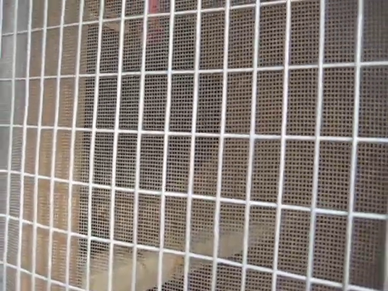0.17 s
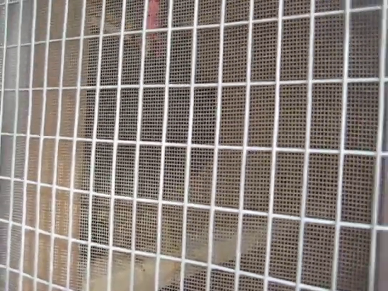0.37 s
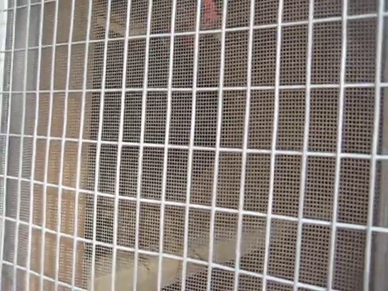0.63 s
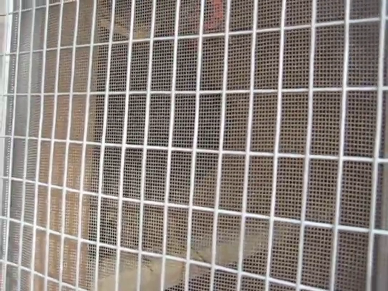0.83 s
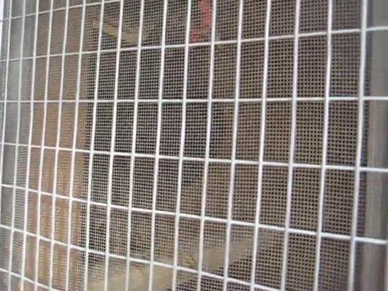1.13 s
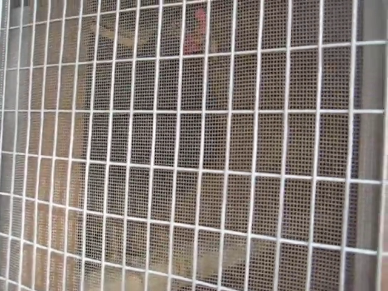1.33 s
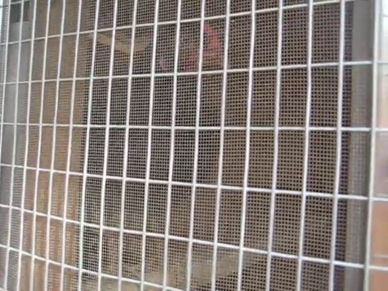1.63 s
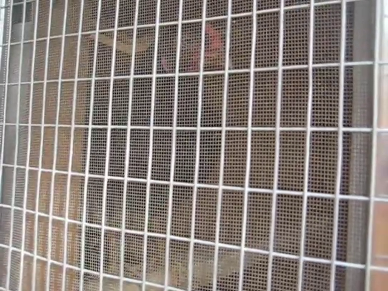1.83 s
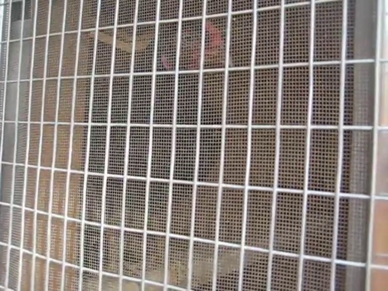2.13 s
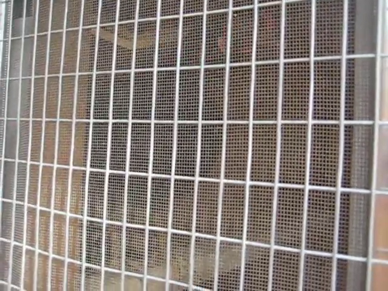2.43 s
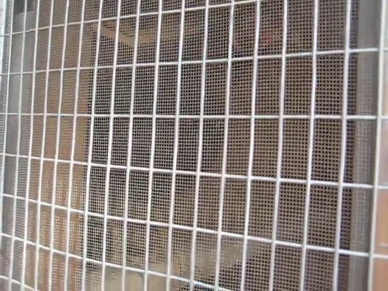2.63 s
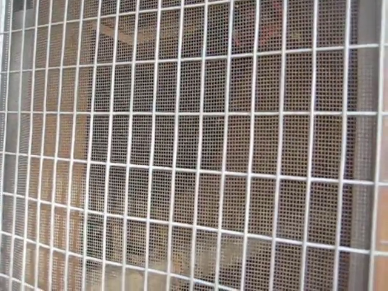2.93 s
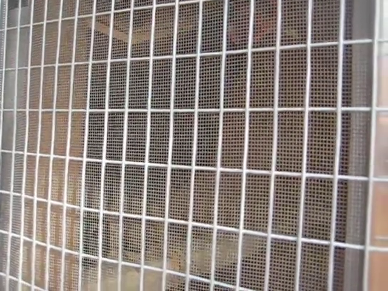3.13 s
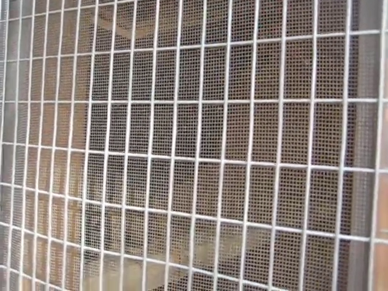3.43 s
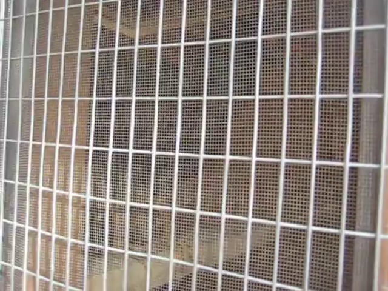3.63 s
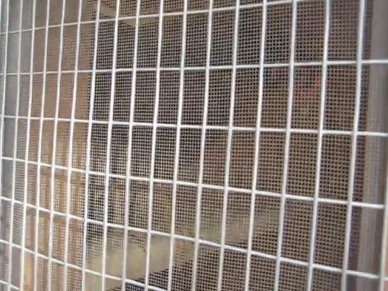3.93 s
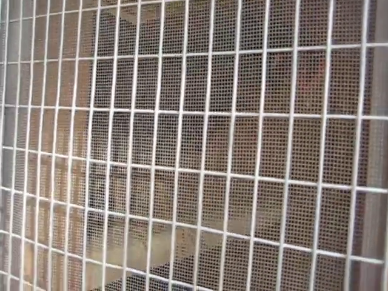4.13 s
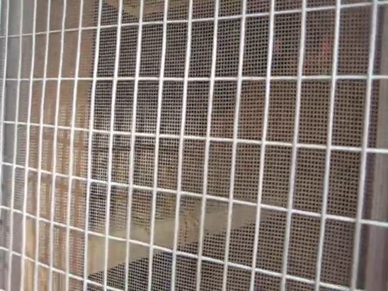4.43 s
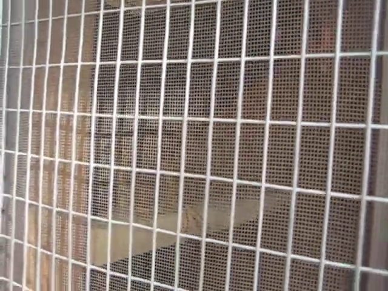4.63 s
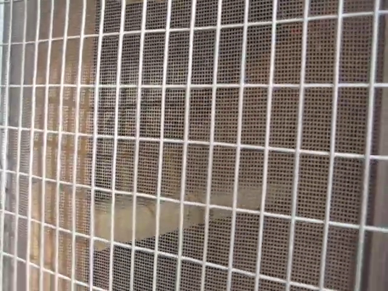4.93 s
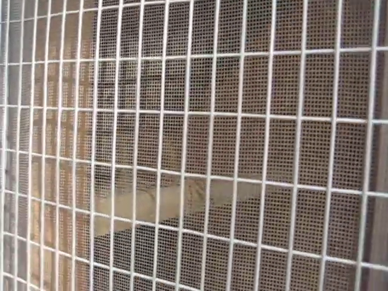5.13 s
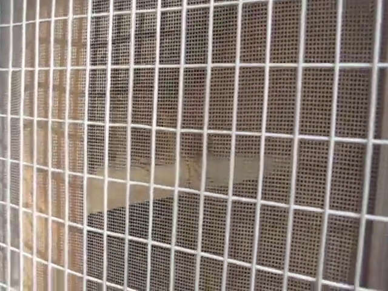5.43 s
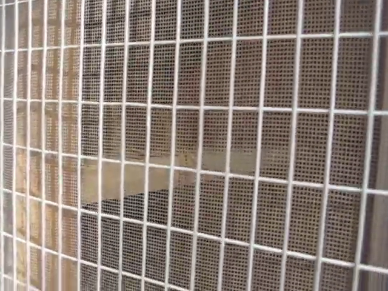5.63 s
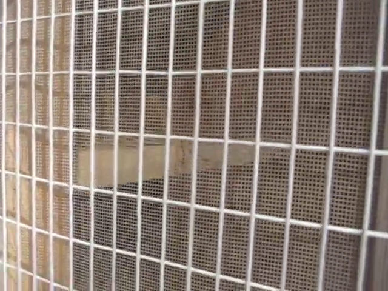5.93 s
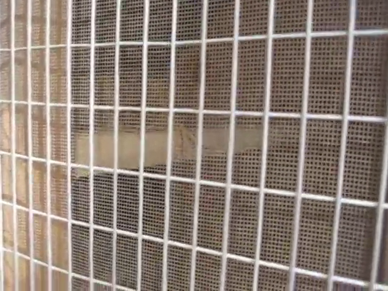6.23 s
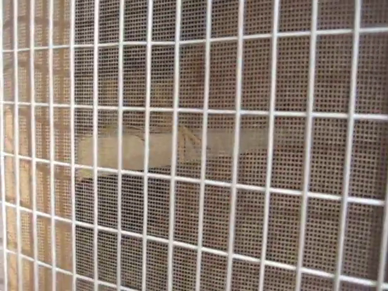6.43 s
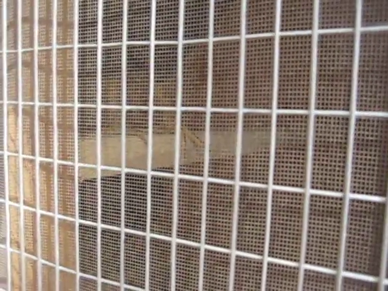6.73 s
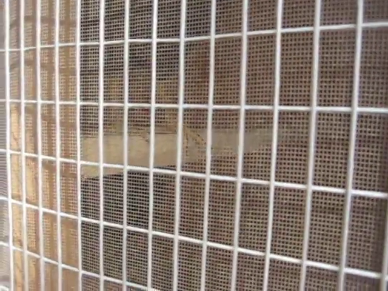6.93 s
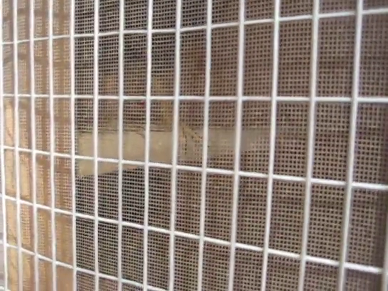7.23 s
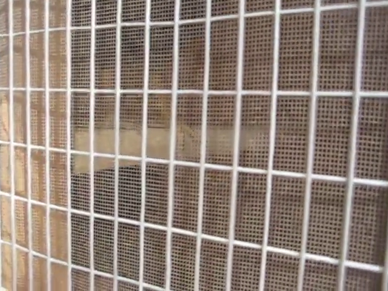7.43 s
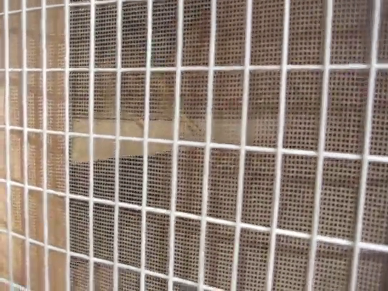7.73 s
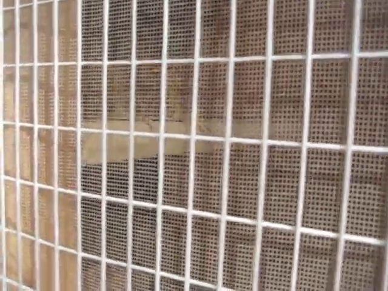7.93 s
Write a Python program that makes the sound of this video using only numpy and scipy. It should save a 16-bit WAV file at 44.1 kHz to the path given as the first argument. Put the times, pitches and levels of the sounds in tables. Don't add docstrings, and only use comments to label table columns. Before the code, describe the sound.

A hen in a wire-fronted wooden coop cackles in rapid hoarse bursts, pauses, then pipes, clucks and squawks roughly over a humming, insect-filled yard.

```python
import sys
import numpy as np
from scipy import signal
from scipy.fft import rfft, irfft, next_fast_len
from scipy.io import wavfile
from scipy.ndimage import uniform_filter1d, map_coordinates

SR = 44100
rng = np.random.default_rng(int(sys.argv[2]) if len(sys.argv) > 2 else 0)


def wrap_up_sound(samples):
    columns = np.atleast_2d(samples).T
    tamed = np.clip(columns, -1, 1)
    steps = np.round(tamed * 32767).astype(np.int16)
    wavfile.write(sys.argv[1], SR, steps)


def voltage_ratio(decibels):
    exponent = np.asarray(decibels, float) / 20
    return 10 ** exponent


N = 355887
T = np.arange(N) / SR


def unit(x):
    return x / np.sqrt(np.mean(np.abs(x) ** 2) + 1e-20)


def ramp(t, length):
    return np.clip(t / length, 0, 1)


def along(points, hz):
    f, v = np.transpose(points)
    return np.interp(np.log(hz + 1), np.log(f + 1), v)


def wobble(rate):
    knots = rng.standard_normal(int(N * rate / SR) + 4)
    return unit(map_coordinates(knots, [T * rate]))


def filtered(x, response):
    m = next_fast_len(N + 8192)
    return irfft(rfft(x, m) * response(np.fft.rfftfreq(m, 1 / SR)), m)[:N]


def resonances(modes):
    def response(f):
        total = 0
        for k, (hz, width, db) in enumerate(modes):
            mode = 1j * f * width / (hz * hz - f * f + 1j * f * width)
            total = total + (-1) ** k * voltage_ratio(db) * mode
        return total
    return response


def latest(rows):
    which = np.clip(np.searchsorted([r[0] for r in rows], T) - 1, 0, None)
    s, *cols = np.array(rows)[which].T
    return T - s, cols


def calls(tables, edge):
    s, *cols = np.transpose(np.concatenate(tables))
    inside = sum((T >= c[0][0] + edge / 2) & (T < c[-1][0] + edge) for c in tables) > 0
    gate = uniform_filter1d(1. * inside, size=int(edge * SR))
    return [np.interp(T, s, c) for c in cols], gate


def steady(slaps):
    return np.tile(slaps, (N, 1))


def turning(x):
    hz, _, z = signal.stft(x, SR, nperseg=512)
    field = uniform_filter1d(rng.standard_normal(z.shape), size=4, axis=0)
    field = uniform_filter1d(field, size=9, axis=1)
    depth_db = 2.6 + 3.5 * ramp(hz - 4000, 4000)[:, None]
    return signal.istft(z * voltage_ratio(depth_db * unit(field)), nperseg=512)[1][:N]


def rasp(gate, slaps, throat_db, beak_db, throat, beak, breath, top_hz=7000):
    rate, uneven = slaps.T
    jitter = 1 + uneven * np.clip(wobble(300), -1.8, 1.8) / 2
    drift = 1 + .07 * uneven * wobble(15)
    cycles = np.cumsum(rate * jitter * drift) / SR
    slap_size = voltage_ratio(8 * uneven * np.clip(wobble(400), -2, 1.5))
    slap = np.diff(np.floor(cycles), prepend=0) * slap_size
    air = rng.standard_normal(N) * np.exp(-3 * (cycles % 1))
    source = unit(slap - slap.mean()) + breath * uneven * unit(air)
    out = 0
    for modes, db in ((throat, throat_db), (beak, beak_db)):
        def tract(f):
            slopes = (1j * f / (380 + 1j * f)) ** 3 / (1 + 1j * f / top_hz) ** 2
            return resonances(modes)(f) * slopes
        out = out + filtered(source * gate * voltage_ratio(db), tract) / np.std(filtered(source, tract))
    return turning(out)


def bursts(t, throat_db, beak_db, rise, hold, t60, slaps, throat, beak, breath, top_hz):
    swell = ramp(t, rise) ** 2
    crack = np.clip(0.0041 / rise, 0, .6)
    push = (t > 0) * (crack + (1 - crack) * swell)
    fade_db = -60 * np.clip(t - rise - hold, 0, None) / t60 - 40 * np.clip(t - rise, 0, hold)
    bright_db = beak_db + 1.2 * fade_db - 150 * rise * (1 - swell)
    return rasp(push, slaps, throat_db + fade_db, bright_db, throat, beak, breath, top_hz)


def partial(hz, db, flutter, rough):
    rough = np.clip(rough, 0, 1)
    keep = np.exp(-np.pi * flutter / SR)
    complex_noise = [1, 1j] @ rng.standard_normal((2, N))
    chaos = unit(signal.lfilter([1], [1, -2 * keep, keep ** 2], complex_noise))
    swing = np.sqrt(1 - rough ** 2) + rough * chaos
    return np.sqrt(2) * voltage_ratio(db) * np.imag(swing * np.exp(2j * np.pi * np.cumsum(hz) / SR))


def syrinx(pitch_hz, partials_db, gate, flutter, rough):
    pitch_hz = pitch_hz * (1 + 0.005075 * wobble(45))
    tone = 0
    for k, db in enumerate(partials_db):
        tone = tone + partial((k + 1) * pitch_hz, db, flutter * (k + 1), rough + 0.2 * k)
    return gate * tone


def notes(tables, rough, third_db, gain_db=0):
    (pitch_hz, db, octave_db), gate = calls(tables, edge=0.0067)
    partials_db = [db, octave_db, octave_db + third_db]
    return voltage_ratio(gain_db) * syrinx(pitch_hz, partials_db, gate, flutter=72, rough=rough)


# start_s, throat_db, beak_db, rise_s, slaps_per_s
CACKLES = [(-.02, -17, -23.5, 0.0092, 343), (.145, -16.5, -20.5, 0.0044, 346),
           (.3135, -17, -19, 0.0034, 285), (.484, -17, -19.5, 0.01, 302), (.662, -17, -23, 0.016, 354),
           (.857, -18, -22, 0.02, 338), (1.1, -16.5, -21.5, 0.025, 303), (1.229, -16, -25.5, 0.013, 275),
           (1.423, -18, -25, 0.027, 386), (1.658, -19.5, -25, 0.026, 420),
           (1.785, -16.5, -26.5, 0.023, 351)]
CACKLE_UNEVEN = [.36, .36, .38, .36, .26, .3, .32, .27, .22, .22, .06]
CACKLE_FADES = [0.23, 0.23, 0.18, 0.18, 0.2, 0.15, 0.11, 0.12, 0.11, 0.085, 0.07]
# centre_hz, width_hz, level_db
CACKLE_THROAT = [(299, 88, -9.5), (538, 98, -4), (783, 115, 0.5), (1150, 245, 6.5), (1368, 377, 2.5),
                 (2070, 194, -5.5)]
CACKLE_BEAK = [(2840, 320, 6), (3460, 360, 8), (4100, 420, 1.5), (5350, 410, -6.5), (6520, 490, -12.5),
               (8060, 570, -15.5), (9750, 1400, -25), (13400, 1200, -28)]


def cackles():
    rows = np.column_stack([CACKLES, CACKLE_UNEVEN, CACKLE_FADES])
    t, (throat_db, beak_db, rise, rate, uneven, t60) = latest(rows)
    rate = rate * (1 - .1 * (1 - ramp(t, .045)))
    slaps = np.transpose([rate, uneven])
    return bursts(t, throat_db, beak_db, rise, 0.032, t60, slaps, CACKLE_THROAT, CACKLE_BEAK,
                  breath=.35, top_hz=14000)


# frequency_hz, density_db per Hz
YARD = [(15, -40.5), (25, -2.5), (60, 8.5), (250, 8), (850, 4.5), (1800, -1), (3300, -7), (5000, -9),
        (6200, -9.5), (9000, -12), (11300, -9.5), (12600, -23.5), (15700, -18.5)]
# time_s, level_db
CRICKETS = [
    (0, -46.5),
    (1.8, -44),
    (2.2, -47.5),
    (8.07, -47),
]
# frequency_hz, level_db
WHINES = [(7558, -59), (7590, -63), (7881, -68), (11488, -69), (15122, -75), (15149, -72)]


def yard():
    def noise(response):
        return unit(filtered(rng.standard_normal(N), response))

    def band(hz, width_hz):
        return noise(lambda f: resonances([(hz, width_hz, 0)])(f) ** 2)

    air = voltage_ratio(-43.0 + 0.045 * wobble(2.2)) * noise(lambda f: voltage_ratio(along(YARD, f)))
    chorus_db = np.interp(T, *np.transpose(CRICKETS))
    crickets = voltage_ratio(chorus_db + 2.3 * wobble(25) + 1.85 * wobble(70)) * band(4580, 340)
    crickets += voltage_ratio(chorus_db - 5 + 3 * wobble(5) + 2.1 * wobble(30)) * band(4300, 450)
    katydids = voltage_ratio(-52.5 + 1.1 * wobble(40)) * band(7460, 800)
    lines = 0
    for hz, db in WHINES:
        level = np.sqrt(2) * voltage_ratio(db + 1.5 * wobble(6))
        lines = lines + level * np.sin(2 * np.pi * hz * T + .6 * wobble(9))
    hum = voltage_ratio(-53.5) * band(122, 30)
    return air + crickets + katydids + lines + hum + sparrows()


# start_s, level_db, first_hz, last_hz, length_s
CHIRPS = [
    (.07, -51, 4200, 4100, 0.04),
    (1.547, -63, 4260, 4140, 0.056),
    (2.13, -57, 4150, 4000, 0.034),
    (2.21, -44, 4280, 3900, 0.054),
    (2.804, -52, 4250, 4040, .05),
    (2.878, -37, 4390, 4030, 0.073),
    (3.53, -52, 4300, 4040, 0.04),
]


def sparrows():
    t, (db, first_hz, last_hz, length) = latest(CHIRPS)
    u = ramp(t, length)
    return np.sin(np.pi * u) * partial(first_hz + (last_hz - first_hz) * u, db - 4, flutter=200, rough=.7)


# centre_s, length_s, change_db
CATCHES = [(0.314, 0.0036, -9), (0.704, 0.016, -8.5), (1.295, .012, -1), (1.479, 0.013, -2.5),
           (1.699, 0.011, -6), (1.83, 0.0094, -6), (5.426, 0.0088, 1), (5.578, 0.016, -10.5),
           (6.1, 0.0057, -9), (6.263, .008, -11), (5.348, 0.016, -6), (6.577, 0.0066, -12),
           (6.7, 0.0082, -14)]


def catches():
    return voltage_ratio(sum(db * np.exp(-(2 * (T - s) / length) ** 2) for s, length, db in CATCHES))


# start_s, peak_db, centre_hz, width_hz, t60_s
PECKS = [(2.375, -41, 2200, 600, 0.062), (3.419, -22.5, 3600, 3640, 0.063), (3.62, -40.5, 2800, 3000, .077),
         (3.65, -36, 2800, 2000, 0.043), (4.045, -33.5, 646, 400, 0.13), (4.107, -38.5, 1360, 2980, 0.78),
         (4.178, -30.5, 410, 606, 0.072), (4.425, -37.5, 624, 400, 0.25), (4.424, -42.5, 2500, 2500, 0.66),
         (4.66, -26.5, 1197, 397, 0.16), (5.171, -23, 1150, 496, 0.062), (5.858, -7.5, 1200, 900, 0.033),
         (4.71, -31, 2800, 3870, 0.093)]
# start_s, peak_db, centre_hz, width_hz, t60_s
PUFFS = [(4.153, -23, 2800, 900, 0.13), (4.689, -26, 2840, 2470, 0.15), (4.85, -33, 3670, 300, .1),
         (5.455, -38, 4100, 300, 0.073), (4.83, -40, 3560, 1200, 0.21), (5.34, -33, 3700, 900, 0.36),
         (5.44, -33, 4300, 900, 0.2), (5.584, -34, 6000, 4990, 0.083), (5.72, -51, 7550, 4000, 0.047),
         (5.86, -51, 7000, 4000, 0.082), (6.11, -51, 7000, 4000, 0.11), (6.344, -32.5, 6530, 3000, 0.12),
         (6.581, -35.5, 6445, 3000, .18), (7.095, -20, 2900, 500, 0.08), (7.137, -25.5, 4100, 800, 0.079)]


def pecks():
    out, t = np.zeros(N), np.arange(SR // 5) / SR
    for rows, rise_s in ((PECKS, 0.002), (PUFFS, 0.0097)):
        for s, db, hz, width_hz, t60 in rows:
            b, a = signal.iirpeak(hz, hz / width_hz, SR)
            grains = rng.standard_normal(len(t)) * rng.exponential(size=len(t))
            grit = unit(signal.lfilter(np.convolve(b, b), np.convolve(a, a), grains))
            envelope = voltage_ratio(db - 60 * t / t60) * (1 - np.exp(-t / rise_s))
            out[round(s * SR):][:len(t)] += envelope * grit
    return out


# time_s, pitch_hz, tone_db, octave_db
WHISTLES = [
    [(4.2, 1232, -42, -63), (4.23, 1325, -37, -47), (4.264, 1320, -37, -49), (4.28, 1324, -41, -66),
     (4.294, 1393, -41, -48), (4.34, 1390, -39, -47), (4.364, 1292, -33.5, -47), (4.396, 1260, -45, -69),
     (4.41, 1350, -45, -73)],
    [(4.43, 1202, -57, -71), (4.448, 1220, -23, -38), (4.51, 1312, -26, -31), (4.53, 1379, -31, -33),
     (4.558, 1410, -21, -29.5), (4.602, 1416, -30.5, -29), (4.622, 1379, -16.5, -34.5),
     (4.662, 1370, -24.5, -43), (4.68, 1322, -28, -38)],
]


def whistles():
    return notes(WHISTLES, rough=.09, third_db=-16, gain_db=0.5)


# start_s, throat_db, upper_db, hold_s, t60_s
CLUCKS = [
    (4.814, -22.5, -28, 0.028, 0.077),
    (5.244, -19.5, -28, 0.072, 0.092),
    (5.487, -17.5, -59, 0.0083, 0.12),
]
# centre_hz, width_hz, level_db
CLUCK_THROAT = [(654, 215, -2.5), (1150, 158, 2.3)]
CLUCK_BEAK = [(1707, 81, 16.5), (2800, 1100, -2.5), (4190, 3300, -8.5)]


def single_bursts(rows, rise, slaps, throat, beak, breath, top_hz):
    t, (throat_db, beak_db, hold, t60) = latest(rows)
    return bursts(t, throat_db, beak_db, rise, hold, t60, steady(slaps), throat, beak, breath, top_hz)


def clucks():
    slaps = (310, 0.35)
    return single_bursts(CLUCKS, 0.0029, slaps, CLUCK_THROAT, CLUCK_BEAK, breath=1.55, top_hz=7000)


# start_s, rise_s, level_db, pitch_hz, t60_s
BREAKS = [
    (4.825, 0.033, -11.5, 1212, 0.03),
    (5.18, 0.014, -30, 1005, 0.07),
    (5.74, 0.011, -27.5, 1615, 0.14),
    (7.095, 0.018, -12, 1168, .12),
    (7.84, 0.017, -28.5, 997, 0.16),
]


def breaks():
    t, (rise, db, hz, t60) = latest(BREAKS)
    rough = .2 + .45 * (T > 7) * (T < 7.3)
    tone_db = db - 60 * np.clip(t - rise, 0, None) / t60
    return syrinx(hz, [tone_db], ramp(t, rise) ** 2, flutter=120, rough=rough)


# time_s, pitch_hz, tone_db, octave_db
PIPES = [
    [(4.87, 1495, -29, -47), (4.885, 1527, -23.5, -55), (4.945, 1474, -22.5, -43), (5.0, 1458, -34, -45),
     (5.058, 1397, -31.5, -45), (5.08, 1560, -23.5, -50), (5.135, 1470, -21.5, -39), (5.17, 1530, -24, -56),
     (5.18, 1540, -56, -55)],
]


def pipes():
    return notes(PIPES, rough=.2, third_db=-16)


# time_s, pitch_hz, tone_db, octave_db
YELP = [
    [(5.25, 1197, -31, -57), (5.31, 1129, -25, -58), (5.335, 1205, -13.5, -42), (5.372, 1141, -15, -42),
     (5.385, 1387, -27.5, -36), (5.415, 1322, -25, -42), (5.45, 1517, -21.5, -25), (5.47, 1336, -20.5, -34),
     (5.482, 1069, -11.5, -46)],
]


def yelp():
    clears, cracks = T > 5.33, T > 5.378
    return notes(YELP, rough=.75 - .6 * clears + .28 * cracks, third_db=-11)


# start_s, held_s, tone_db
SQUAWKS = [
    (5.565, 0.16, -17.5),
    (5.768, 0.015, -21),
    (5.846, .17, -19),
    (6.091, 0.18, -18.5),
    (6.343, 0.15, -19.5),
    (6.568, 0.14, -18.5),
]
# time_s, pitch_hz
SQUAWK_PITCH = [(5.57, 1090), (5.6, 1150), (5.66, 1118), (5.72, 1195), (5.76, 1170), (5.83, 1040),
                (5.85, 1150), (5.92, 1172), (6.01, 1146), (6.07, 1000), (6.095, 1090), (6.158, 1136),
                (6.25, 1090), (6.33, 1030), (6.35, 1060), (6.41, 1075), (6.45, 1150), (6.5, 1110),
                (6.55, 1000), (6.58, 1085), (6.62, 1230), (6.66, 1130), (6.72, 1050), (6.8, 1000)]
# start_s, length_s, tone_db, clear_share_0_to_1
CLEAR = [
    (5.613, 0.062, 0.5, 0.37),
    (5.709, 0.03, 5.5, 0.9),
    (5.731, 0.0307, -26, 0.96),
    (5.905, 0.038, 0.5, 0.35),
    (5.931, 0.047, 5, 0.97),
    (6.135, .06, 1.5, 0.59),
    (6.44, 0.032, -1, 0.2),
    (6.663, 0.032, 1.5, .5),
]
# time_s, ring_hz, level_db
RING = [
    [(5.564, 3350, -52), (5.568, 3380, -32), (5.604, 3410, -29.5), (5.66, 3354, -49), (5.69, 3460, -29.5),
     (5.78, 3340, -42), (5.81, 3310, -73), (5.83, 3320, -56)],
    [(5.844, 3330, -41), (5.858, 3340, -29), (5.884, 3340, -34), (5.9, 3302, -30.5), (5.958, 3440, -39.5),
     (6.02, 3287, -39), (6.054, 3247, -66), (6.08, 3260, -58)],
    [(6.09, 3270, -35), (6.106, 3272, -25), (6.152, 3370, -41), (6.162, 3320, -28), (6.18, 3280, -38),
     (6.188, 3220, -27), (6.238, 3220, -30.5), (6.33, 3246, -79)],
    [(6.34, 3242, -48), (6.344, 3230, -34), (6.36, 3218, -23.5), (6.402, 3180, -33), (6.456, 3072, -26),
     (6.504, 3170, -48), (6.56, 3113, -67)],
    [(6.566, 3180, -43), (6.57, 3190, -33), (6.606, 3220, -26), (6.616, 3180, -35), (6.644, 3100, -20.5),
     (6.702, 3073, -39), (6.704, 3050, -36), (6.79, 3094, -68)],
]
# centre_hz, width_hz, level_db
RASP_THROAT = [(709, 226, -3.5), (980, 386, -1.5), (1150, 126, 1)]
RASP_BEAK = [(1630, 230, 13), (2320, 510, 4.5), (3280, 170, 15), (4200, 1200, -7), (5500, 1200, -19),
             (8300, 3100, -14)]


def squawks():
    t, (held, db) = latest(SQUAWKS)
    rise_s, settle_s = 0.0015, 0.067
    gate = ramp(t, rise_s) ** .5
    fade_db = -60 * np.clip(t - held, 0, None) / 0.11
    clear, clear_db = 0, 0
    for s, length, change_db, share in CLEAR:
        spell = ramp(T - s, 0.013) * ramp(s + length - T, 0.01)
        clear = clear + spell * share
        clear_db = clear_db + spell * change_db
    clear = np.clip(clear, 0, 1)
    rough = .52 + (.06 - .52) * clear
    pitch_hz = np.interp(T, *np.transpose(SQUAWK_PITCH)) + 19 * wobble(25) * (1 - clear)
    tone_db = db + fade_db + clear_db
    octave_db = tone_db - 20 - 40 * rough
    tone = syrinx(pitch_hz, [tone_db, octave_db], gate, flutter=230, rough=rough)

    (ring_hz, ring_db), beak_gate = calls(RING, edge=0.004)
    ring = beak_gate * partial(ring_hz, ring_db + 1.9 + 2 * wobble(90), flutter=250, rough=rough + .3)

    settled = ramp(t - rise_s, settle_s) * (1 - 0.17 * (1 - ramp(held - t, settle_s)))
    rasp_db = db - 0.5 - 9 * settled + 0.67 * fade_db - 35 * clear ** 2
    slaps = steady((378, .2))
    rasping = rasp(gate, slaps, rasp_db + 1.5, (rasp_db + ring_db) / 2 - 4, RASP_THROAT, RASP_BEAK, breath=1.6)
    return tone + ring + rasping


# start_s, length_s, level_db, first_hz, last_hz
HUMS = [
    (6.76, 0.28, -43, 543, 656),
    (7.122, 0.042, -25.5, 871, 885),
    (7.64, .18, -37, 1160, 1276),
    (7.84, 0.08, -34, 1130, 1260),
    (7.92, 0.2, -32.5, 1240, 1210),
]


def hums():
    t, (length, db, first_hz, last_hz) = latest(HUMS)
    gate = ramp(t, 0.0021) * ramp(length - t, 0.0021)
    rough = .15 + .45 * (first_hz > 800)
    pitch_hz = first_hz + (last_hz - first_hz) * ramp(t, length)
    return syrinx(pitch_hz, [db], gate, flutter=310, rough=rough)


# start_s, length_s, first_db, last_db, upper_over_throat_db
GROWL = [
    (6.8, 0.35, -46.5, -34, -18),
    (7.17, 0.26, -38.5, -33.5, -11),
    (7.455, 0.201, -34, -35, -10.5),
    (7.64, 0.1926, -33.5, -31.5, -10.5),
    (7.835, 0.14, -37.5, -36.5, -11),
    (7.98, 0.28, -31, -32.5, -11),
]
# centre_hz, width_hz, level_db
GROWL_THROAT = [(288, 49, 3), (503, 410, -5), (821, 68, 6.5), (950, 170, -3), (1210, 303, -2)]
GROWL_BEAK = [(1760, 980, 5.3), (2440, 290, 28.6), (3600, 390, 26.8)]


def growl():
    t, (length, first_db, last_db, upper_db) = latest(GROWL)
    level_db = first_db + (last_db - first_db) * ramp(t, length) + 2.7 * wobble(15)
    gate = ramp(t, 0.0021) * ramp(length - t, 0.0021)
    slaps = steady((205, .38))
    return rasp(gate, slaps, level_db, level_db + upper_db, GROWL_THROAT, GROWL_BEAK, breath=1.3)


# start_s, throat_db, beak_db, hold_s, t60_s
FINAL = [
    (7.057, -16.5, -31, 0.061, 0.15),
]
# centre_hz, width_hz, level_db
LAST_THROAT = [(718, 180, -3.5), (885, 160, 0.5), (1170, 71, 4)]
LAST_BEAK = [(1670, 300, -18), (2310, 100, 5.5), (2800, 240, 6), (4300, 180, 2.5), (5900, 620, -4)]


def last_cackle():
    slaps = (295, .36)
    return single_bursts(FINAL, 0.002, slaps, LAST_THROAT, LAST_BEAK, breath=1.2, top_hz=4000)


def hens():
    hoarse = cackles() + clucks() + growl() + last_cackle()
    tonal = whistles() + breaks() + pipes() + yelp() + hums()
    return catches() * (hoarse + tonal + squawks())


# centre_hz, width_hz, level_db
BOARDS = [(758.6, 21, -1.5), (874, 36, 5), (1099, 19, -18), (1350, 8.5, -15), (2160, 21, -32)]


def boxed(x):
    return filtered(x, lambda f: 1 + sum(resonances([mode])(f) for mode in BOARDS))


# frequency_hz, t60_s
COOP = [(300, 0.38), (1200, 0.12), (4000, 0.095), (12000, 0.0051)]


def coop(x):
    hz, t, z = signal.stft(rng.standard_normal(SR // 3), SR, nperseg=128)
    decay = voltage_ratio(-60 * t / along(COOP, hz)[:, None])
    tail = rfft(signal.istft(z * decay, SR, nperseg=128)[1])
    power = np.abs(tail) ** 2
    evenness = np.sqrt(uniform_filter1d(power, size=500) / uniform_filter1d(power, size=40))
    tail = irfft(tail * evenness)
    return signal.fftconvolve(np.pad(x, (90, 0)), tail / np.linalg.norm(tail))[:N]


def ducking(loud, knee_db=-27, depth=.62, release_s=.035):
    k = 1 / (release_s * SR)
    power = signal.lfilter([k], [1, k - 1], loud ** 2)
    return (1 + power / voltage_ratio(knee_db) ** 2) ** (-depth / 2)


def scene():
    near = hens() + pecks()
    near = voltage_ratio(-2.5) * boxed(near) + voltage_ratio(-7.5) * coop(near)
    return (near + ducking(near) * yard())[None]


def roll_off(x):
    return signal.sosfilt(signal.butter(12, 16440, fs=SR, output="sos"), x)


def record(dry):
    ceiling, top_hz = .8, 15720
    held = dry[0] / (1 + np.abs(dry[0] / ceiling) ** 4) ** (1 / 4)
    mix = filtered(held, lambda hz: hz < top_hz)[None]
    return roll_off(mix)


dry = scene()
out = record(dry)
wrap_up_sound(out)
```